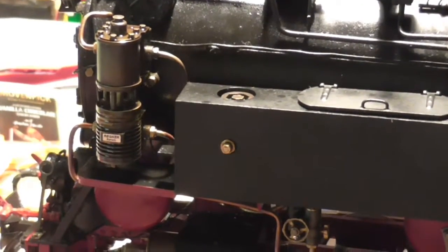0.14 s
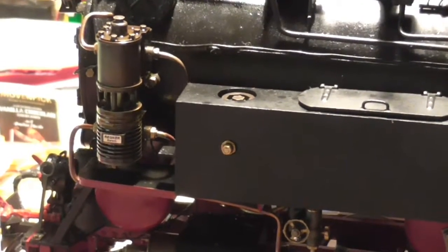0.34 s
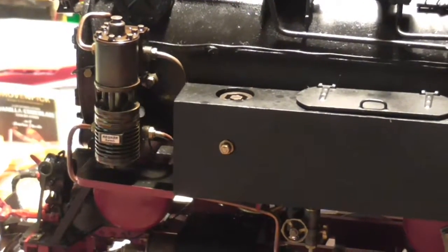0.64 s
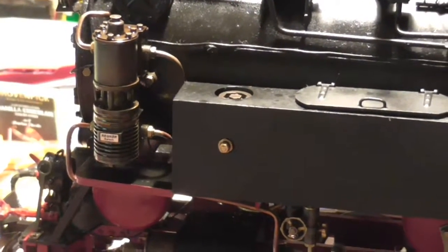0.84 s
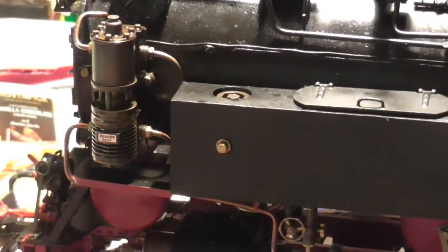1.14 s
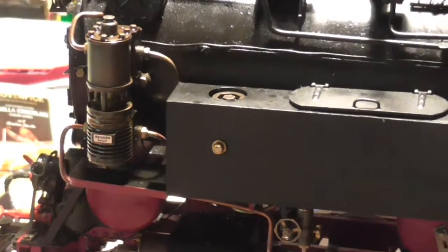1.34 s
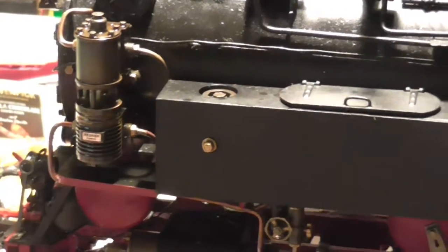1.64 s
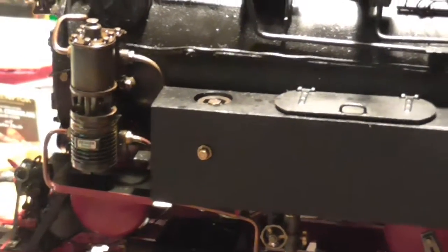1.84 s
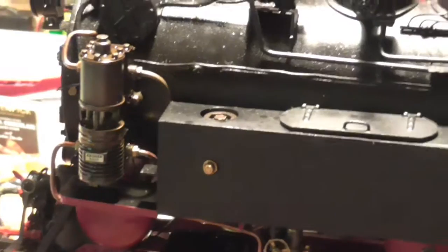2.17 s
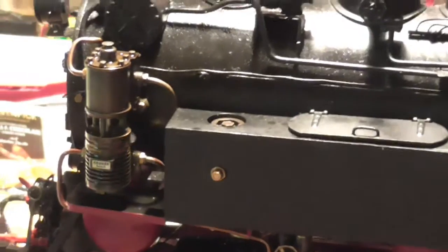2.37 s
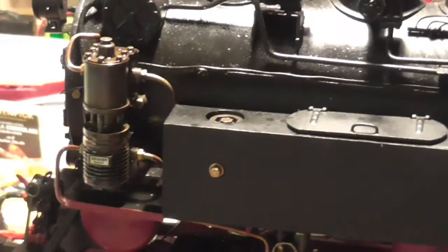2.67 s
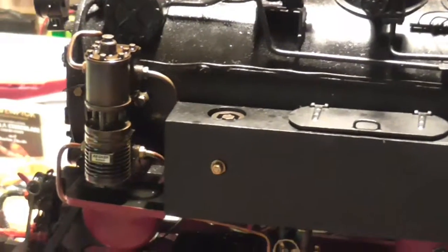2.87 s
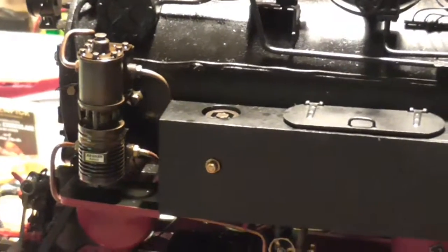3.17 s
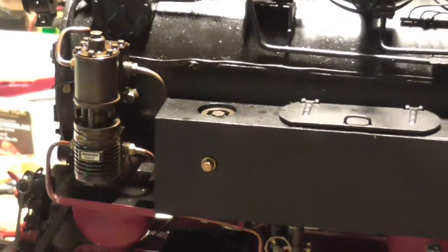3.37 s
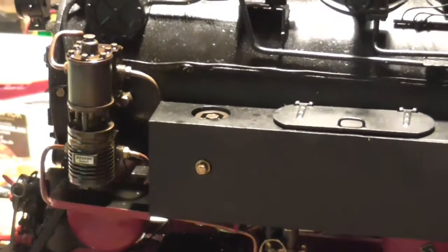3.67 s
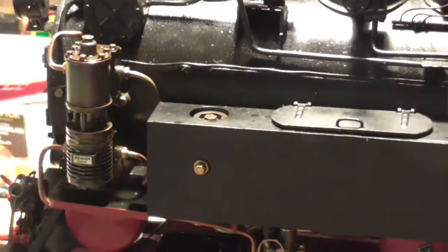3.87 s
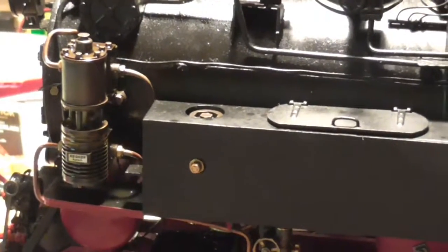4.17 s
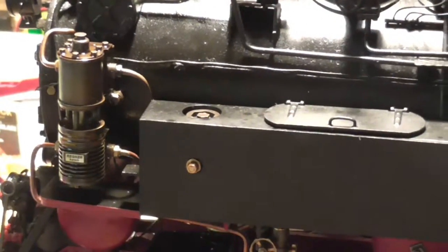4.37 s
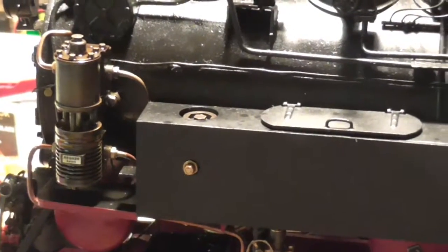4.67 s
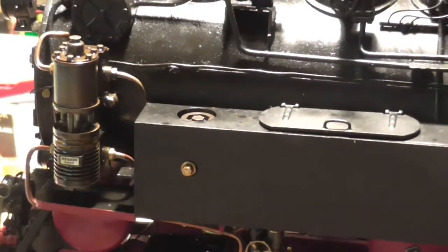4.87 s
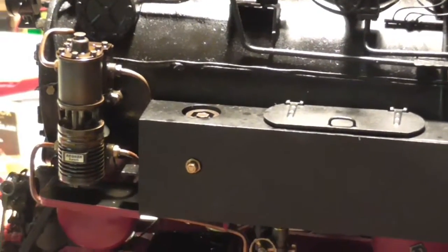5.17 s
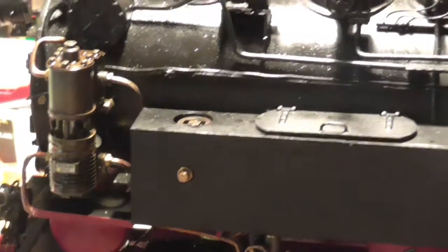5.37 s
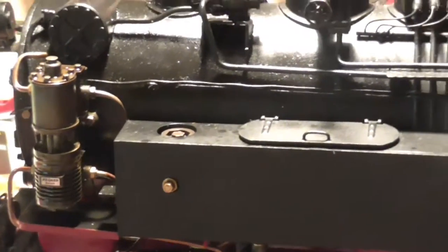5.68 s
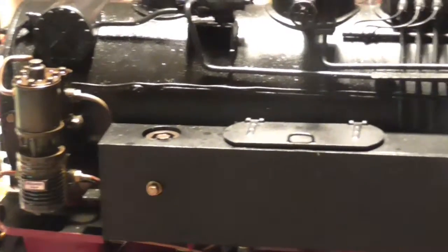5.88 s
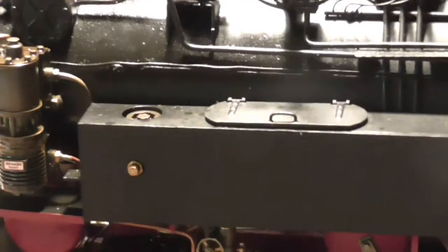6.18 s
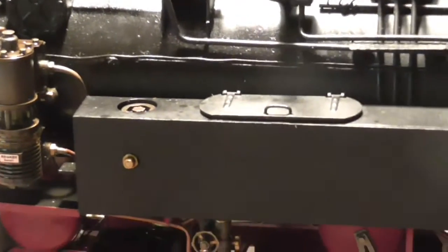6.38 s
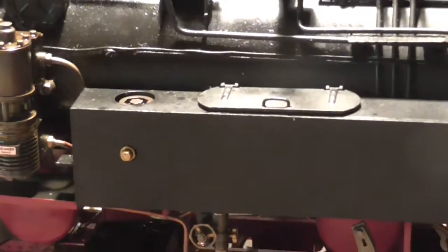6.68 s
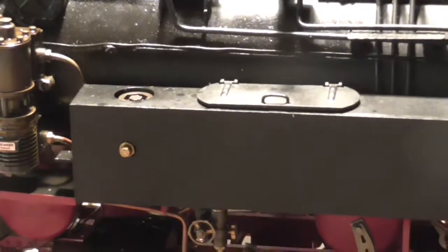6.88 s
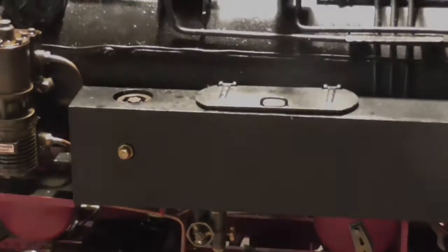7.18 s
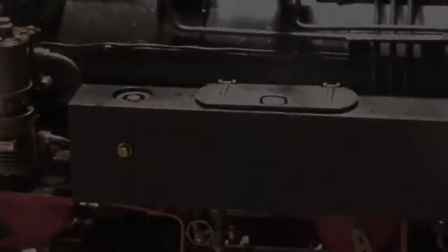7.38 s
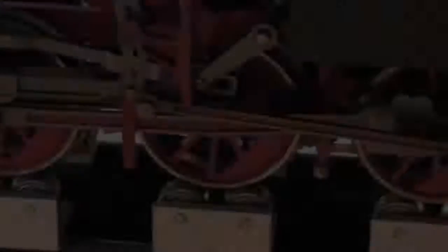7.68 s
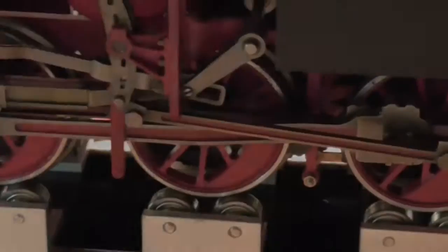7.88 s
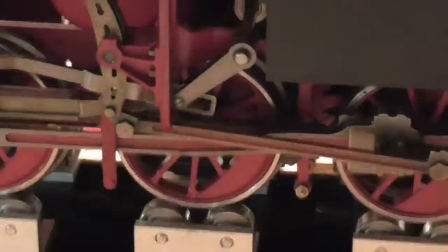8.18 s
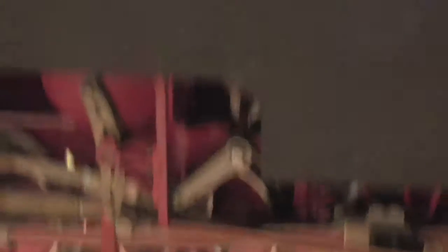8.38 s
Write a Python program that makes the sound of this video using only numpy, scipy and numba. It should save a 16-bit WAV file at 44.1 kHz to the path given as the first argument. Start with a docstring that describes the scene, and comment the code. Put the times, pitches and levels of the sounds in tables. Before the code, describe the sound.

Close beside a model steam locomotive indoors, wet steam hisses steadily, brightest around 4-5 kHz, grainy with bursting droplets, over a quiet hollow boiler roar and a thin airy leak near 10 kHz. Faint low whistling tones open the scene. At 0.75-0.95 s short chuffs burst into a bright gush that seeps away. From 1.1 to 2.2 s it is mostly sputter; a tick and sharp spits come at 2.2-2.3 s, then brisk chuffs and a ringing gush at 2.55-2.8. Sputtering continues quietly, dipping near 4.2. Spits cluster at 5.0-5.2 as a longer gush swells until 5.7, where a crisp puff tails off by 6. Dull knocks sound at 5.7 and 6.6, then cluster at 7.0-7.2 and 7.4-7.5, rattling briefly. A quick chuff at 7.6 brings breathy whistles; soft wavering tones, a spit and a small knock near 8.3 close it, hiss still running at 8.5.

```python
"""A small steam feed pump works on a model locomotive indoors, close to the microphone.
Throughout, droplets sputter as noise bursts in a drain pipe, resonant noise sings as a leak near 10 kHz,
and filtered noise roars in the boiler. Faint whistles open the scene; from the first second the exhaust gushes at
uneven strokes, as jets of noise through port resonances, with chuffs as the valve throws over. Ticks and spits of
water (short noise bursts) follow; later, water blows ring the pipes more often, and new whistles close the scene."""
import sys
import numpy as np
from scipy import signal
from scipy.fft import rfft, irfft
from scipy.io import wavfile
from scipy.ndimage import uniform_filter1d
from numba import njit

SR = 44100
rng = np.random.default_rng(int(sys.argv[2]) if len(sys.argv) > 2 else 0)


def transcribe(signal):
    """Save signal, clipped to [-1, 1], as a 16-bit WAV file at the path in sys.argv[1]."""
    frames = np.atleast_2d(signal).T
    limited = np.clip(frames, -1, 1)
    pcm = np.round(limited * 32767).astype(np.int16)
    wavfile.write(sys.argv[1], SR, pcm)


N = 375732
TIME = np.arange(N) / SR  # [s]
FREQ = np.maximum(np.fft.rfftfreq(N, 1 / SR), 1)  # [Hz]

# Levels in the tables are relative: each source may add its own gain.
# steady steam through the pump between strokes: (time [s], level [dB])
STEADY_FLOW = [(0, -33), (1.1, -35), (1.6, -37.5), (2.15, -35), (2.45, -36), (3.0, -36.5), (3.7, -37),
               (4.15, -40), (4.7, -34), (5.3, -31.5), (6.1, -34), (6.55, -35), (6.9, -32.5), (7.3, -35),
               (7.95, -33.5), (8.52, -37)]
# colour of the wet steam: (frequency [Hz], level [dB])
WET_COLOUR = [(100, -44), (500, -15.5), (900, -11), (1300, -8), (1600, -13), (2050, -9), (2450, -16),
              (2900, -17.5), (3750, -10), (4150, -3), (4500, -1), (5700, -4), (6700, -7), (7700, -4),
              (8900, -13.5), (12000, -11.5), (13300, -25), (16000, -46)]
# colour of a steady gush, against the wet steam: (frequency [Hz], level [dB])
GUSH_COLOUR = [(700, -2), (1100, 2.5), (2000, 0), (2800, 1.5), (3700, 1.5), (4300, 3.5)]
# resonances of the drain pipe: (frequency [Hz], width [Hz], level [dB])
DRAIN_PIPE_MODES = [(4602, 227, 1), (4790, 123, 2), (4660, 110, -7.5), (5130, 56, -11), (5446, 93, -1),
                    (5930, 160, -4.5), (6370, 110, -13), (7300, 79, -7.5)]
# resonances of the exhaust pipe, which barks with each spurt: (frequency [Hz], width [Hz], level [dB])
BARK_MODES = [(890, 81, -2), (1290, 84, -7), (1840, 420, -3.5)]
# louder spits of water: (time [s], level [dB])
WATER_SPITS = [(0.4377, -15), (2.2287, -13.5), (2.257, -31), (2.3304, -18), (2.943, -16), (4.9714, -15),
               (5.081, -18), (5.1142, -16), (5.235, -18), (5.9896, -14.5), (6.2986, -16), (6.3729, -18),
               (6.8523, -20), (6.8867, -15), (8.274, -13)]
# spurts of steam, the strong ones as the valve throws over:
# (time [s], length [s], level [dB], power share of the bright jet [0-1])
STEAM_SPURTS = [(0.742, 0.034, -32.5, 0), (0.803, 0.017, -25.5, 0.63), (0.925, 0.035, -32.5, 0.1),
                (0.94, 0.023, -29, 1), (1.143, 0.025, -39, 0.05), (1.645, 0.025, -42, 0),
                (1.867, 0.025, -36.5, 0), (2.457, .015, -37.5, 0), (2.558, 0.022, -31, .4),
                (2.621, 0.034, -30, 1), (2.622, 0.011, -23, 0.65), (2.789, 0.024, -25, 0.33),
                (3.37, .03, -49, 0), (3.808, 0.0073, -34, 0.02), (4.365, 0.058, -38.5, 0.02),
                (5.157, 0.038, -35, 0.2), (5.731, 0.011, -25.5, 1), (5.886, 0.019, -31, 0.1),
                (5.912, 0.05, -29, .03), (7.226, 0.027, -33, 0.03), (7.571, 0.018, -40, 0.4),
                (7.63, 0.038, -27, 0.55), (8.189, 0.053, -36, .03)]
# openings of the exhaust port, wide strokes and slight weeps:
# (fully open [s], starts to close [s], swell time constant [s], dry jet level [dB], wet steam level [dB],
#  sharpness against the jet [dB], ring of the port against the jet [dB])
PORT_OPENINGS = [(0.153, 0.485, 0.066, -47, -42, -1, 3), (.56, .72, .04, -49, -58, -3, -10),
                 (0.811, 0.94, 0.057, -29, -29.5, -2, -10), (2.35, 2.52, .01, -65, -60, -8, 0),
                 (2.61, 2.826, 0.068, -32.5, -31, -16, 4.5), (4.22, 4.6, .015, -79, -74, -16, 7),
                 (4.675, 5.2, .1, -50, -42, -5, 4), (5.215, 5.696, 0.045, -34.5, -32.5, -21, 4.5),
                 (5.732, 5.946, .003, -28.5, -31.5, -17, 0), (7.574, 7.66, .002, -36.5, -29, -14, -17)]
# colour of the dry exhaust: (frequency [Hz], level [dB])
DRY_COLOUR = [(100, -30), (700, -5.5), (1300, -8.5), (2800, -61), (3800, -39), (5500, -9.5), (7300, -2),
              (8600, -7.5), (9500, 3.5), (10700, -0.5), (12300, -7), (13700, -2), (16000, -17)]
# resonances of the wide-open exhaust port: (frequency [Hz], width [Hz], level [dB])
THROAT_MODES = [(9600, 480, 0.5), (10050, 790, -0.5), (10450, 600, 0.5), (11600, 520, 3), (12300, 490, 2),
                (12750, 750, -1)]
# resonances of a sharp jet: (frequency [Hz], width [Hz], level [dB])
SHARP_JET_MODES = [(14400, 620, 0), (15350, 560, -1)]
# the narrow leak: (time [s], level [dB], pitch [Hz])
LEAK_COURSE = [(0, -45.5, 10000), (.8, -62, 9900), (1.5, -47.5, 9980), (2.7, -49.5, 9850),
               (3.0, -40.5, 10050), (3.25, -49, 9900), (4.1, -47.5, 9980), (5.8, -38, 10100),
               (6.24, -46, 9850), (6.33, -44, 9330), (6.5, -53, 9270), (6.575, -40, 9450),
               (6.605, -40, 10000), (7.0, -43, 9900), (7.4, -44.5, 9800), (7.8, -41.5, 9930),
               (8.52, -47, 9900)]
# knocks in the feed pipe: (time [s], thud level [dB], rattle level [dB])
PIPE_KNOCKS = [(2.625, -44, -47), (5.66, -35, -41), (6.563, -31.5, -54), (7.0005, -26, -36),
               (7.137, -29.5, -40), (7.157, -31, -47), (7.184, -31, -38.5), (7.436, -36, -40),
               (7.523, -25, -32), (8.305, -34, -40)]
# resonances rung by a knock: (frequency [Hz], width [Hz], level [dB])
KNOCK_MODES = [(275, 40, -36), (423, 64, -5), (656, 83, 1), (630, 30, 4), (900, 110, -2), (1330, 91, -10.5),
               (1572, 120, -17)]
# resonances of the loose fittings: (frequency [Hz], width [Hz], level [dB])
RATTLE_MODES = [(380, 180, 1), (840, 240, 3.5), (1080, 260, -3), (1370, 300, -3.5)]
# ticks of the valve gear: (time [s], level [dB])
VALVE_TICKS = [(2.2287, -22), (2.3304, -33), (5.1532, -28), (6.3729, -33)]
# faint whistles that come and go:
# (start [s], end [s], first pitch [Hz], last pitch [Hz], width [Hz], level [dB], pure share of power [0-1])
FAINT_WHISTLES = [(0, 0.51, 493, 503, 35, -43.5, 0.26), (0.445, 1.093, 510, 507, 31, -45, 0),
                  (0, 0.65, 922, 935, 78, -49.5, 0.12), (1.042, 1.3, 1803, 1790, 6.6, -63, .7),
                  (1.267, 1.52, 1778, 1766, 9, -51.5, .8), (1.36, 1.55, 820, 820, 14, -63, .6),
                  (2.323, 2.6, 11780, 11780, 920, -48, 0), (4.172, 5.6, 11800, 11730, 1400, -49.5, 0),
                  (7.565, 7.768, 7900, 7800, 650, -36, 0), (7.566, 7.75, 10100, 9900, 990, -42, 0.1),
                  (7.7, 8.45, 7720, 7720, 1500, -45, 0.03), (7.714, 8.497, 598.3, 570.6, 34, -44, .5),
                  (8.177, 8.374, 1010, 965, 22, -49, .6), (8.33, 8.56, 829, 840, 18, -49, 0.7),
                  (8.373, 8.53, 1025, 1060, 22, -54, .7), (8.36, 8.52, 1695, 1680, 20, -59, .6),
                  (8.46, 8.62, 1145, 1150, 30, -57, .6), (8.473, 8.65, 790, 790, 28, -47, .6)]
# draught through the boiler: (time [s], roar level [dB], flue note level [dB], flue pitch [Hz])
BOILER_DRAUGHT = [(0, -40, -56, 640), (.9, -41, -45.5, 630), (1.3, -41, -63, 645), (2.1, -40.5, -54.5, 677),
                  (3.6, -41.5, -52.5, 635), (5.3, -40.5, -47, 623), (6.2, -42, -50.5, 605),
                  (7.1, -40, -48, 650), (7.45, -41.5, -45.5, 627), (7.9, -40.5, -41, 619),
                  (8.52, -40, -47, 570)]
# colour of the boiler's roar: (frequency [Hz], level [dB])
ROAR_COLOUR = [(25, -30), (50, -18), (95, -15.5), (140, -4.5), (170, -6), (225, -4.5), (300, 1),
               (455, -3.5), (620, 3), (780, -10), (870, -4.5), (1050, -16), (1800, -22.5)]
# hollows of boiler and smokebox: (frequency [Hz], width [Hz], level [dB])
CAVITY_MODES = [(277, 42, 2.5), (312, 48, -1), (364, 74, 1), (412, 18, 0), (496, 32, 0), (580, 47, 0),
                (615, 20, 4), (659.3, 43, 5), (755, 21, -5), (987, 9.7, -17)]
# reflections from tank and boiler cladding: (delay [s], level [dB])
PANEL_REFLECTIONS = [(.0029, -34), (.0047, -13), (.0083, -13), (0.0126, -13.5)]
# the two microphone ports: (frequency [Hz], left minus right [dB], side minus mid [dB])
MICROPHONE_PORTS = [(40, -5.5, 5), (140, -5, -7.5), (660, -6, -13.5), (1010, -1.5, -6), (1600, -2, -8),
                    (2200, 0.5, -9), (3100, 0, -16.5), (6600, 0.5, -16.5), (8100, -2, -12), (8360, 7, -2),
                    (8940, -3.5, -6.5), (11500, -4, -4.5), (12400, -2, -6), (15500, 2, -10)]

SPURT_RISE_S = .003
SAG_DB_PER_S = 11  # pressure falls while the port is open
SHUT_S, SHUT_SHARP_DB = 0.053, -9  # the port shuts; the narrowing jet turns sharper
LINGER_DB, LINGER_S, LINGER_SHARP_DB = -10, 0.36, -9  # steam left in the cylinder seeps out
CONTACT_HZ = 950  # water cushions a knock above this frequency
TOP_HZ = 15600  # upper limit of the band


def undb(db):
    """Amplitude ratio from its logarithmic measure in decibels."""
    return 10 ** (np.asarray(db) / 20)


def unit(x):
    """Normalisation to a root-mean-square of 1."""
    return x / np.sqrt(np.mean(x ** 2))


def curves(table):
    """Linear interpolation in time of every column after the first."""
    s, *columns = np.transpose(table)
    return [np.interp(TIME, s, column) for column in columns]


def colour(table, axis=1):
    """Spectral gain, its decibels interpolated on a logarithmic frequency axis."""
    points = np.transpose(table)
    return undb(np.interp(np.log(FREQ), np.log(points[0]), points[axis]))


def ringing(modes):
    """Modal superposition: the complex responses of simple resonators add."""
    return sum(undb(db) / (1 + 1j * (FREQ ** 2 - hz ** 2) / (FREQ * width)) for hz, width, db in modes)


def steep_resonances(modes):
    """Incoherent superposition: the powers of steep, separate resonances add."""
    power = 0
    for hz, width, db in modes:
        power = power + undb(db) ** 2 * np.abs(ringing([(hz, width, 0)])) ** 4
    return np.sqrt(power)


def shaped(x, response):
    """Linear filtering: the spectrum is multiplied by a response of unit mean power."""
    return irfft(rfft(x) * response / np.sqrt(np.mean(np.abs(response) ** 2)), N)


def noise():
    """Turbulence as Gaussian white noise."""
    return rng.standard_normal(N)


def walk(rate):
    """Slow random fluctuation of spread 1: noise averaged twice over 1/rate seconds."""
    size = max(int(SR / rate), 2)
    once = uniform_filter1d(noise(), size, mode="wrap")
    return unit(uniform_filter1d(once, size, mode="wrap"))


@njit
def resonate(x, hz, width):
    """Time-varying resonance: a band-pass whose centre follows hz."""
    y, band, low = np.empty(len(x)), 0., 0.
    for i in range(len(x)):
        g, damping = np.tan(np.pi * hz[i] / SR), width / hz[i]
        v = (band + g * (x[i] - low)) / (1 + g * (g + damping))
        band, low, y[i] = 2 * v - band, low + 2 * g * v, damping * v
    return y


def sing(hz, width_hz):
    """Resonant selection: two moving band-passes in series draw a pitch out of turbulence."""
    hz = np.clip(hz, 50, .44 * SR)
    once = resonate(noise(), hz, float(width_hz))
    return unit(resonate(once, hz, float(width_hz)))


def bursts(table, decay_s):
    """Exponential relaxation after sudden events (time, level), whose powers add."""
    s, db = np.transpose(table)
    index = np.clip((s * SR).astype(int), 0, N - 1)
    power = np.bincount(index, undb(db) ** 2, N)
    return np.sqrt(signal.lfilter([1], [1, -np.exp(-2 / (decay_s * SR))], power + 1e-18))


def fade(elapsed_s, time_s):
    """Exponential decay: gain 1 until a moment, dying away after it."""
    return np.exp(-np.clip(elapsed_s / time_s, 0, 20))


def strokes():
    """Discharge through a port: power swells, sags as pressure falls, shuts and lingers as seepage."""
    wet, jet, edge, throat = np.zeros((4, N))
    for opens, closes, swell_s, jet_db, wet_db, sharp_db, throat_db in PORT_OPENINGS:
        sag = undb(-SAG_DB_PER_S * np.clip(TIME - opens, 0, closes - opens))
        pressure = fade(opens - TIME, swell_s) * sag
        shutting = fade(TIME - closes, SHUT_S)
        near_close = fade(closes - TIME, SHUT_S)  # rises towards the closing moment
        port = pressure * shutting
        narrowing = port * near_close
        seep = pressure * undb(LINGER_DB) * near_close * fade(TIME - closes, LINGER_S)

        escaping = port ** 2 + seep ** 2
        wet += undb(wet_db) ** 2 * escaping
        jet += undb(jet_db) ** 2 * escaping
        sharp = (undb(sharp_db) * port) ** 2
        sharp += (undb(SHUT_SHARP_DB) * narrowing) ** 2 + (undb(LINGER_SHARP_DB) * seep) ** 2
        edge += undb(jet_db) ** 2 * sharp
        # the ring dies twice as fast as the flow
        throat += (undb(jet_db + throat_db) * port * shutting) ** 2
    return wet, jet, edge, throat


def chuffs(fall_s=0.0021):
    """Transient discharge: the power of each spurt divides between wet steam and bright jet."""
    wet, bright = np.zeros(N), np.zeros(N)
    for s, length, db, share in STEAM_SPURTS:
        gate = np.clip((TIME - s) / SPURT_RISE_S, 0, 1) * fade(TIME - s - length, fall_s)
        power = (undb(db) * gate) ** 2
        wet += (1 - share) * power
        bright += share * power
    return wet, bright


def wet_steam(gush_power, chuff_power, flow_db=-2.0, spit_db=-4, bark_db=-16, drop_spread_db=1.0,
              drop_s=0.0045, smooth_share=0.36, surge_db=1.0, gulp_db=0.85, gulp_rate=22):
    """Two-phase flow: bursting droplets modulate turbulence, which excites the drain and exhaust pipes."""
    flow = undb(curves(STEADY_FLOW)[0] + flow_db + gulp_db * walk(gulp_rate))
    count = 4000
    drop_times = rng.uniform(0, N / SR, count)
    drop_levels = drop_spread_db * rng.exponential(size=count).clip(0, 4.5)
    drops = np.column_stack([drop_times, drop_levels])
    sputter = unit(bursts(drops, drop_s) * undb(surge_db * walk(51)))

    # a stronger flow is smoother
    steam = flow ** 2 + gush_power + chuff_power
    smooth = np.clip(smooth_share * np.sqrt(steam / np.median(steam)), 0, .85)
    grain = smooth + (1 - smooth) * sputter ** 2
    spits = undb(spit_db) * bursts(WATER_SPITS, decay_s=0.00084)
    power = (flow ** 2 + chuff_power) * grain + spits ** 2

    pipe = colour(WET_COLOUR) + ringing(DRAIN_PIPE_MODES)
    hiss = shaped(noise() * np.sqrt(power), pipe)
    gush = shaped(noise() * np.sqrt(gush_power * grain), pipe * colour(GUSH_COLOUR))
    rough_spurts = noise() * np.sqrt(chuff_power) * sputter
    bark = undb(bark_db) * shaped(rough_spurts, ringing(BARK_MODES) * colour(WET_COLOUR))
    return hiss + gush + bark


def exhaust(jet_power, edge_power, throat_power, chuff_power, chuff_edge_db=-7, chuff_throat_db=-7,
            idle_edge_db=-68, flutter_db=2.0, billow_db=1.2):
    """Jet noise: a wide port rings, a narrow one sounds sharper, and a trace always escapes."""
    ring_power = throat_power + undb(chuff_throat_db) ** 2 * chuff_power
    sharp_power = edge_power + undb(chuff_edge_db) ** 2 * chuff_power + undb(idle_edge_db) ** 2
    gush = shaped(noise(), colour(DRY_COLOUR)) * np.sqrt(jet_power + chuff_power)
    throat = shaped(noise(), steep_resonances(THROAT_MODES)) * np.sqrt(ring_power)
    edge = shaped(noise(), steep_resonances(SHARP_JET_MODES)) * np.sqrt(sharp_power)
    return (gush + throat + edge) * undb(flutter_db * walk(180) + billow_db * walk(23))


def leak(leak_db=-1, flutter_db=1.5):
    """Narrow-band jet tone: turbulence in a gap sings as a thin, airy whistle."""
    db, hz = curves(LEAK_COURSE)
    return sing(hz, width_hz=1040) * undb(db + leak_db + flutter_db * walk(89))


def knocks(rattle_s=0.012):
    """Impulse excitation: cushioned blows of water thud in the feed pipe and rattle loose fittings."""
    s, thud_db, shake_db = np.transpose(PIPE_KNOCKS)
    blows = bursts(np.column_stack([s, thud_db]), decay_s=1 / SR)
    body = ringing(KNOCK_MODES) / (1 + 1j * FREQ / CONTACT_HZ) ** 3
    thuds = irfft(rfft(blows) * body / np.abs(irfft(body, N)).max(), N)
    shaking = bursts(np.column_stack([s, shake_db]), decay_s=rattle_s)
    return thuds + shaped(noise(), steep_resonances(RATTLE_MODES)) * shaking


def ticks(tick_db=-2, ring_hz=7300, width_hz=5000):
    """Heavily damped impact: very short bursts ring one broad resonance of the valve gear."""
    impacts = noise() * bursts(VALVE_TICKS, decay_s=0.00053)
    return undb(tick_db) * shaped(impacts, steep_resonances([(ring_hz, width_hz, 0)]))


def whistles(swell_s=0.014, fade_s=0.1, waver_db=0.5, waver_hz=4):
    """Tone and narrow-band noise combined: soft pitches swell, glide, waver and fade more slowly."""
    out = np.zeros(N)
    for start, end, first_hz, last_hz, width, db, pure in FAINT_WHISTLES:
        gate = np.clip(np.minimum((TIME - start) / swell_s, (end - TIME) / fade_s), 0, 1)
        hz = np.interp(TIME, [start, end], [first_hz, last_hz]) + waver_hz * walk(26.4)
        sine = np.sqrt(2 * pure) * np.sin(2 * np.pi * np.cumsum(hz) / SR)
        airy = np.sqrt(1 - pure) * sing(hz, width)
        out += undb(db + waver_db * walk(29)) * gate * (sine + airy)
    return out


def boiler(cavity_db=4, flutter_db=1.5, wander_hz=6):
    """Cavity resonance: the draught roars in the hollows and sounds the flue's wavering note."""
    roar_db, note_db, hz = curves(BOILER_DRAUGHT)
    cavities = undb(cavity_db) * steep_resonances(CAVITY_MODES)
    roar = undb(roar_db) * shaped(noise(), np.hypot(colour(ROAR_COLOUR), cavities))
    flue = undb(note_db) * sing(hz + wander_hz * walk(35), width_hz=94)
    return (roar + flue) * undb(flutter_db * walk(28.0))


def microphone(x, room_t60_s=0.26, mirror_hz=1500):
    """Reflection and reverberation: panels mirror the treble; room sound differs between two unequal ports."""
    echoes = sum(undb(db) * np.exp(-2j * np.pi * FREQ * s) for s, db in PANEL_REFLECTIONS)
    panels = echoes * FREQ / (FREQ + mirror_hz)
    room = rfft(noise() * np.exp(-np.minimum(np.log(1000) * TIME / room_t60_s, 20)))
    room_unit = room / np.sqrt(np.mean(np.abs(room) ** 2))
    side = room_unit * colour(MICROPHONE_PORTS, axis=2)
    # the level difference is split evenly between left and right
    shade = np.sqrt(colour(MICROPHONE_PORTS))
    ports = np.array([(1 + side) * shade, (1 - side) / shade]) * 2 / (shade + 1 / shade)
    return irfft(rfft(x) * (1 + panels) * ports, N)


def scene():
    """Superposition of pump and boiler, heard from beside the water tank."""
    wet_chuff, bright_chuff = chuffs()
    wet, jet, edge, throat = strokes()
    steam = wet_steam(wet, wet_chuff) + exhaust(jet, edge, throat, bright_chuff) + leak()
    mechanism = knocks() + ticks()
    background = whistles() + boiler()
    return microphone(steam + mechanism + background)


def record(dry):
    """Band limitation: a steep elliptic low-pass cuts the top."""
    return signal.sosfilt(signal.ellip(10, .2, 80, TOP_HZ, fs=SR, output="sos"), dry)


dry = scene()
out = record(dry)
transcribe(out)
```